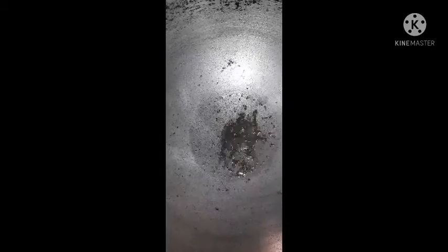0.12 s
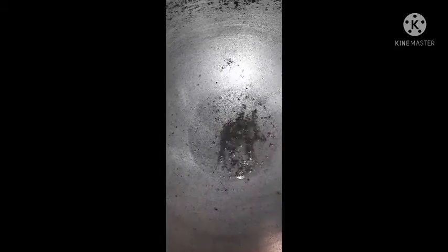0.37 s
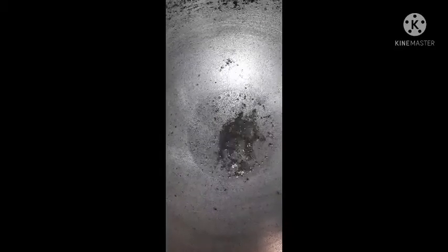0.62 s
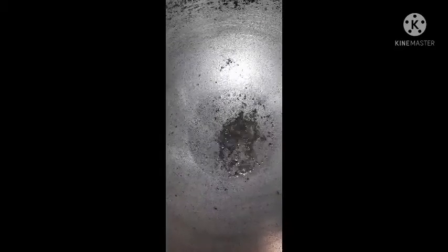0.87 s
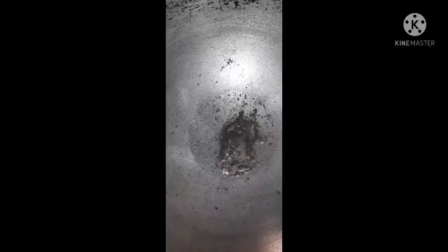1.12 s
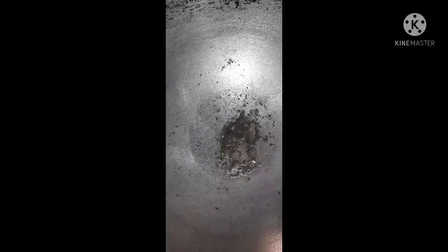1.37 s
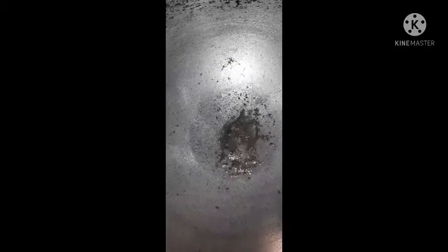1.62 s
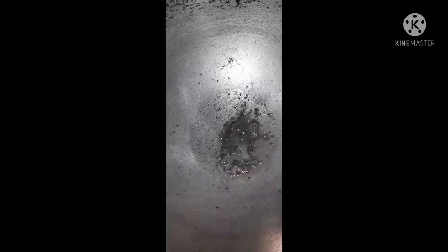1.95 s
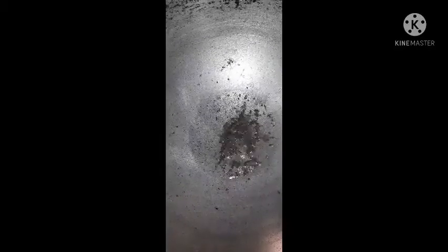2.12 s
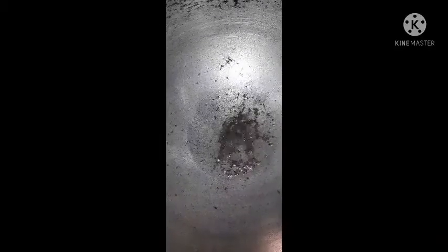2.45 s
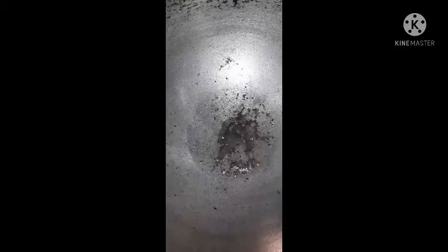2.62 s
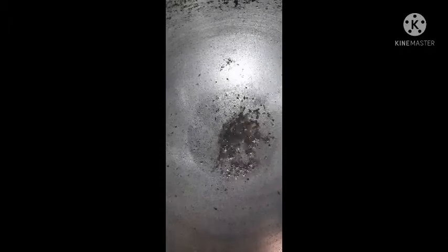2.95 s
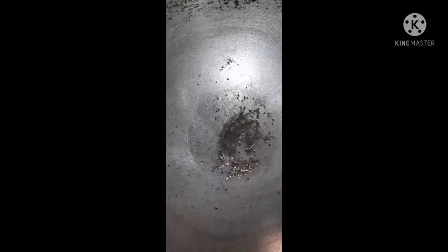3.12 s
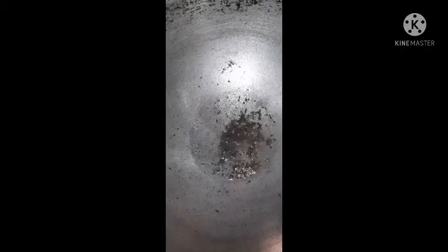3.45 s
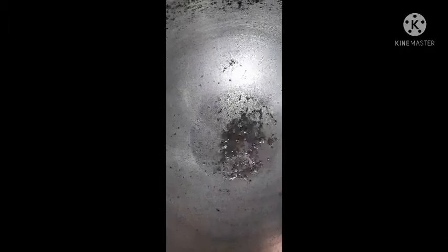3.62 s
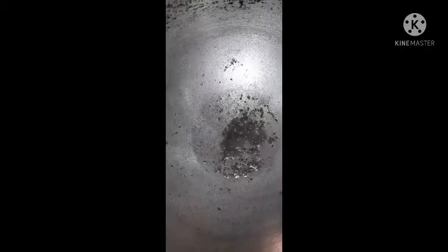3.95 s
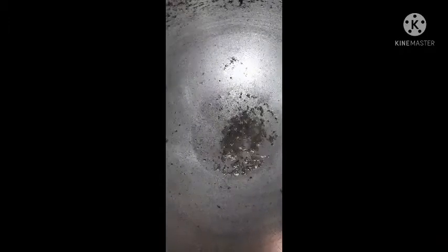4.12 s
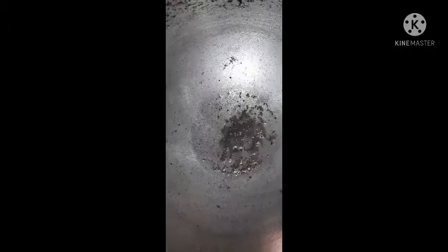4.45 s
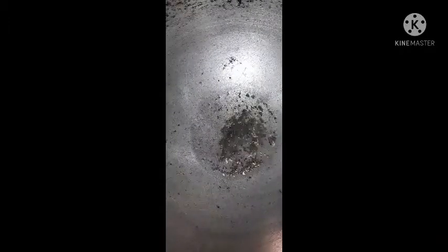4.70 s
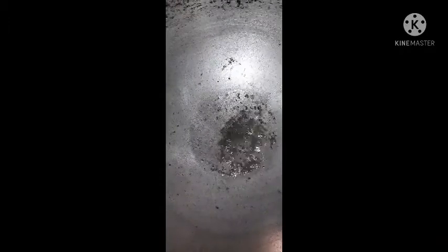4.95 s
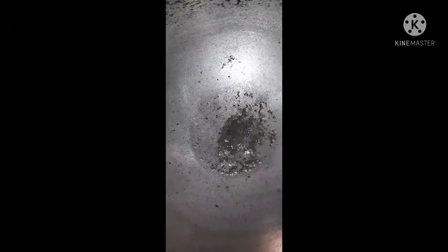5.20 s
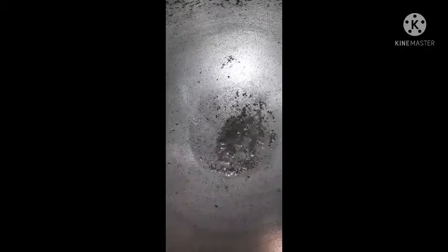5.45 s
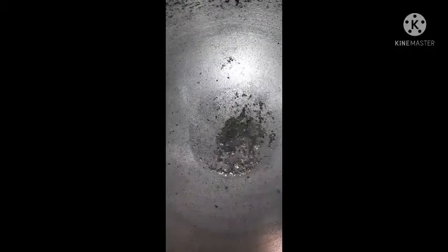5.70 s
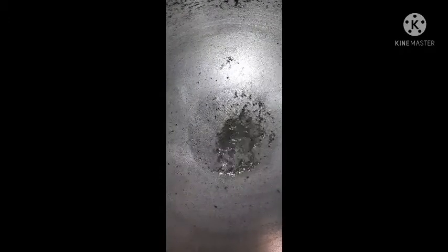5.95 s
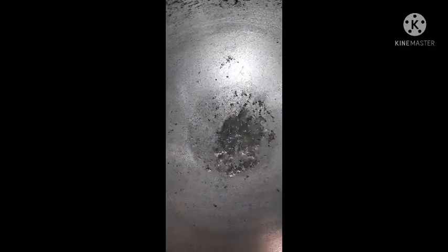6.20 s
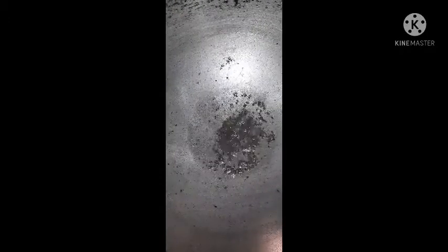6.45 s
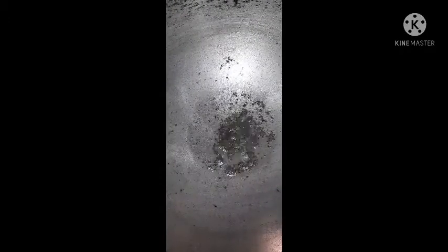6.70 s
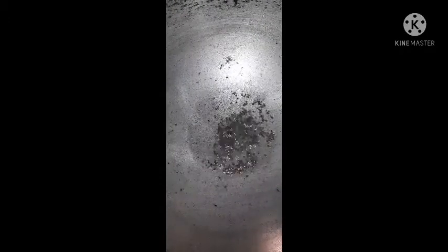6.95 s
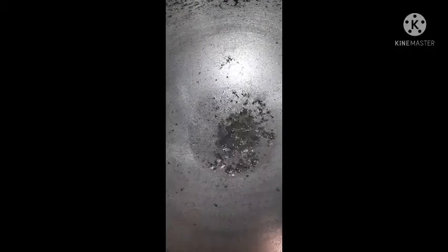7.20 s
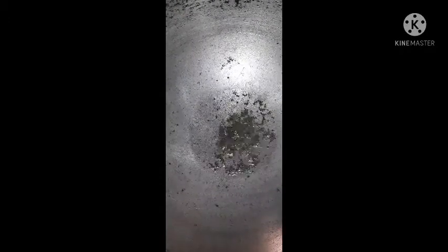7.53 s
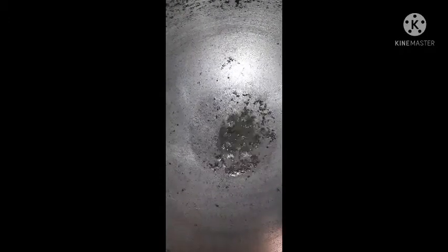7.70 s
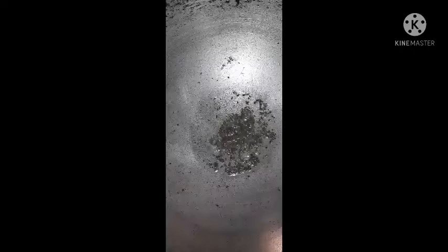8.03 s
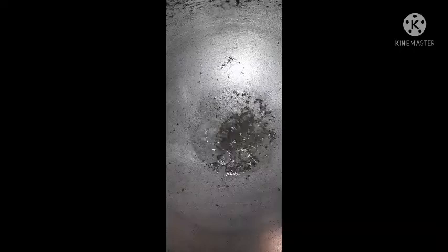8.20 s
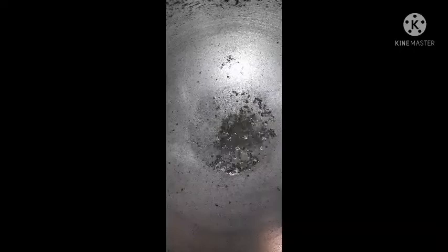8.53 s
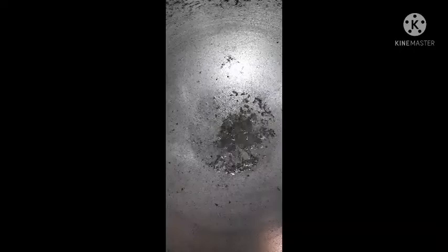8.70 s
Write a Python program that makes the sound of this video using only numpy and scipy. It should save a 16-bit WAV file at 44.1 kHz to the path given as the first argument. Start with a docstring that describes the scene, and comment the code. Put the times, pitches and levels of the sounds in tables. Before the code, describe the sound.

Close stereo pickup over a steel pan of hot oil. Small seeds burst from the first moment in bright, woody pops with sharp snaps, irregular at first, then crowding together. Fine bubbles fizz underneath and water spits click. A few low thumps bump the right side. Dull traffic and far motors hum behind, in a small kitchen with short reverberation.

```python
"""Seeds pop in hot oil in a steel pan under a two-port microphone, over fizzing bubbles and dull street noise.
Pops start at once: each husk rings as a few damped modes, with a noise crack, a second tear and a sharp snap.
Far motors, wavering harmonics, swell early and late. From 1.6 s water spits as clicks; from 2.4 s droplets
thump the right port with a damped push. Near 3.3, 6.1 and 7.9 s narrow noise swells and fades, sinking in
pitch. A slow-running engine joins near 7.7 s, and the fizz flares strongest near 8.3 s."""
import sys
import numpy as np
from scipy import signal
from scipy.fft import rfft, irfft
from scipy.io import wavfile

SR = 44100
rng = np.random.default_rng(int(sys.argv[2]) if len(sys.argv) > 2 else 0)


def output_pcm(signal):
    """Save a mono or channel-first signal as 16-bit PCM at the path in sys.argv[1].

    Samples are clipped to [-1, 1] before scaling.
    """
    pcm = np.clip(np.atleast_2d(signal).T, -1, 1) * 32767
    wavfile.write(sys.argv[1], SR, np.round(pcm).astype(np.int16))


N = 390726
TIME = np.arange(N) / SR  # the whole scene, s
AGE = np.arange(1024) / SR  # time since the start of a short sound, s
EDGE_HZ = 15750  # upper band limit

# loud bursting seeds: (time [s], relative ring energy [dB], ring pitch [Hz], relative snap energy [dB])
POPS = [(0.0375, -8, 4200, -4.5), (0.2706, -30, 4040, -8), (0.4345, -5, 3480, -1),
        (0.6626, -18.5, 2520, -32), (0.7545, -10, 5850, -15), (0.804, -17, 2100, -15),
        (0.8215, -1, 3100, 0), (0.8933, -10, 4430, -19), (0.969, -19.5, 4730, -33),
        (1.0039, -18.5, 2700, -33), (1.0813, -5.5, 4070, -31), (1.093, -6, 2850, -30),
        (1.2416, -17, 4950, -28), (1.2675, -9.5, 3850, -18), (1.297, -9.5, 2400, -12),
        (1.4413, -12.5, 3180, -10), (1.7256, -15, 3200, -33), (1.8333, -5.5, 5000, -15),
        (1.85, -8, 3570, -24), (2.0127, -16.5, 8300, 3), (2.0955, -6.5, 3100, -28),
        (2.1107, -5.5, 3600, 1.5), (2.1697, -9, 8000, -11.5), (2.3854, -6, 4470, -0.5),
        (2.5955, -13.5, 3850, -22), (2.8353, -21.5, 2690, -14), (2.9337, -12, 6070, 4.5),
        (3.0599, -16.5, 4640, -28), (3.153, -17.5, 5370, -4), (3.2998, -2.5, 2054, -41),
        (3.6497, -0.5, 2350, -4), (3.6541, -5.5, 3050, -8), (3.745, -14, 2570, -6.5),
        (3.809, -5, 4460, -11), (3.844, -7.5, 3940, -26), (3.927, -6.5, 5100, -3), (4.1026, -9, 3150, 0),
        (4.165, -3, 2720, -11), (4.1924, -14, 2800, -7), (4.2064, -3.5, 4530, -15), (4.267, -7, 3570, -12),
        (4.4091, -13.5, 2770, -19), (4.5, 1, 2400, 4), (4.56, -11, 3520, -6), (4.6067, -8, 3370, -7),
        (4.7723, -13.5, 3440, -21), (4.929, -18.5, 2400, -28), (5.128, -3, 2270, -7),
        (5.2937, -2.5, 2650, 2.5), (5.353, -12.5, 4600, -17), (5.417, -13, 2870, -17),
        (5.4546, -13, 5230, -29), (5.589, -10, 4720, -16), (5.6301, -8.5, 3780, -5), (5.733, -7, 5100, 1.5),
        (5.9464, -8, 6200, 3.5), (5.979, -11.5, 3060, -33), (6.039, -6, 2330, -12),
        (6.0937, -11.5, 2400, -21), (6.1502, -7.5, 3600, -27), (6.2712, -7, 3970, -16),
        (6.283, -5, 2620, -10), (6.302, -13, 8400, 3), (6.349, -1.5, 2920, -5), (6.4059, -12, 5100, 1.5),
        (6.414, -7.5, 4500, -22), (6.475, -6.5, 3900, 2.5), (6.534, -8.5, 4650, -2),
        (6.6277, -12, 2550, -3), (6.6556, -6.5, 5170, -8), (6.8234, -14, 4800, -23),
        (6.8698, -8, 7950, 0.5), (6.9304, -6.5, 3800, -16), (6.999, -15, 3200, -17),
        (7.0251, -11.5, 2580, -42), (7.131, -2.5, 3900, 0.5), (7.1784, -3.5, 4000, 1),
        (7.2744, -17.5, 2850, -18), (7.2993, -3, 3400, -9), (7.3588, -7.5, 5000, -2),
        (7.406, -3, 4600, 11.5), (7.5285, -9.5, 2940, -6), (7.5546, -6.5, 4370, -25),
        (7.6902, -9.5, 3900, -20), (7.7059, -6, 3430, -28), (7.7413, -4.5, 4150, -28),
        (7.7547, -12.5, 5160, -18), (7.7813, -8.5, 2500, -3.5), (7.8904, -2, 2160, -3),
        (7.92, -6, 4540, -12), (7.992, -11, 3130, 2), (8.0318, -10.5, 2830, -24), (8.065, -8, 3860, -3),
        (8.2053, -15, 5350, -18), (8.2307, -11.5, 7100, 3), (8.2712, 1, 2800, 1), (8.4455, -13, 4060, -24),
        (8.4859, -5, 2940, -5), (8.575, -9.5, 3100, -41), (8.637, -8, 4280, -10), (8.7841, -9.5, 3620, -6)]
# water flashing in the oil, all snap and no ring: (time [s], relative energy [dB])
SPITS = [(1.5942, -2), (1.7942, -3.5), (3.44, -4), (3.4767, 1), (3.521, -2.5), (3.5697, -2.5), (3.972, 3),
         (4.4419, -0.5), (4.5524, -1), (4.579, 0), (4.735, 2), (4.846, 6), (4.9441, -0.5), (4.9812, 1),
         (5.0205, 0.5), (5.388, -4), (6.197, 6.5), (6.923, 4.5), (7.7179, 7), (8.11, 1.5)]
# colour of a snap: (frequency [Hz], relative spectral level [dB])
SNAP_COLOUR = [(100, -15.5), (350, -6.5), (2000, -7.5), (6000, 2.5), (9000, -5.5), (12500, 5), (15500, -7)]
# how hard the oil fizzes, before the spray of each blow: (time [s], level [dB])
FIZZ_CURVE = [(0, -47.5), (.24, -55), (1.3, -49.5), (1.55, -44.5), (2.2, -48), (2.8, -57), (3.85, -49),
              (5.18, -46), (5.87, -53), (6.32, -45), (6.76, -53.5), (8.31, -40.5), (8.6, -51)]


def amp(db):
    """Decibels to gain."""
    return 10 ** (np.asarray(db) / 20)


def unit(x):
    """Scales a sound to a mean energy of 1 a channel."""
    return x / np.sqrt(np.mean(np.sum(x ** 2, -1)) + 1e-20)


def read(points, hz, column=1):
    """Reads a table column on a log-frequency axis."""
    table = np.transpose(points)
    return np.interp(np.log(hz + 1), np.log(table[0] + 1), table[column])


def level(curve):
    """Gain at every sample from rows of (time [s], level [dB])."""
    return amp(np.interp(TIME, *np.transpose(curve)))


def add(mix, s, sound):
    """Mixes a sound in at time s, cut off at the end of the mix."""
    part = mix[..., max(round(s * SR), 0):][..., :sound.shape[-1]]
    part += sound[..., :part.shape[-1]]


def coloured(x, spectrum):
    """Filters a scene-long sound by a spectrum and sets its rms to 1."""
    gain = amp(read(spectrum, np.fft.rfftfreq(N, 1 / SR)))
    return unit(irfft(rfft(x) * gain, N)) * np.sqrt(N)


def click(spectrum, size=1024):
    """A minimum-phase click: its energy comes as early as this spectrum allows."""
    log_gain = np.log(amp(read(spectrum, abs(np.fft.fftfreq(size, 1 / SR)))))
    return unit(np.fft.ifft(np.exp(np.conj(signal.hilbert(log_gain)))).real)


def waver(per_s):
    """Slow random drift along straight lines between normal random knots."""
    knots = np.arange(0, N / SR + 1, 1 / per_s)
    return np.interp(TIME, knots, rng.standard_normal(len(knots)))


def engine(start, length, top_hz, db, overtones_db, rev, swell, wobble):
    """A far motor: a few wavering harmonics whose pitch and level rise and fall in one arch."""
    arch = np.sin(np.pi * np.clip((TIME - start) / length, 0, 1))
    pitch_hz = top_hz * (1 - rev * (1 - arch)) * (1 + wobble * waver(35))
    turns = np.cumsum(pitch_hz) / SR
    tone = sum(amp(d) * np.sin(2 * np.pi * k * turns) for k, d in enumerate(overtones_db, 1))
    return np.sqrt(2) * tone * arch ** swell * amp(db + 3.2 * waver(18))


def street(likeness=0.9):
    """Dull, lumpy traffic noise and far motors, nearly alike at both ports, slightly louder at the right."""
    # rumble before its flutter: (time [s], level [dB])
    rumble_curve = [(0, -55), (1.2, -53), (2.88, -60), (3.55, -56), (7.55, -54.5), (8.3, -51)]
    # colour of the rumble: (frequency [Hz], relative spectral level [dB])
    rumble_colour = [(22, -26), (65, 0.5), (85, -4), (110, 6), (160, -8.5), (280, 0), (420, -6.5),
                     (620, -18.5), (850, -11), (1400, -28), (4000, -29.5)]
    # swelling and fading vehicles, before wavering:
    # (start [s], length [s], top pitch [Hz], relative top level [dB], third harmonic [dB])
    vehicles = [(0.152, 1.09, 204, -62.5, -22), (0.948, 1.4, 287, -50, -19.5),
                (4.616, 0.494, 268, -54, -23), (4.698, 3.1, 270.8, -56.5, -27),
                (7.694, 1.78, 299.8, -54, -15.5)]
    # slow-running engine, before wavering: (start [s], length [s], top pitch [Hz], relative top level [dB])
    idling = (7.69, 1.8, 64.55, -52.5)
    left, other = rng.standard_normal((2, N))
    same = np.clip(likeness, 0, 1)
    right = same * left + np.sqrt(1 - same ** 2) * other
    rumble = level(rumble_curve) * coloured(np.array([left, right]), rumble_colour)
    motors = engine(*idling, [0, -8, -12], rev=0.027, swell=0.22, wobble=0.0141)
    for *row, third_db in vehicles:
        motors += engine(*row, [-1, -25, third_db], rev=.15, swell=1.0, wobble=.013)
    return (amp(waver(12)) * rumble + motors) * amp([[-1], [1]])  # dB at left and right


def kitchen(x, tail_db=-12, build_s=0.01, steel_t60=0.036):
    """A few near echoes, the faint ring of the steel, then a tail whose treble dies first."""
    # reverberation: (frequency [Hz], 60 dB decay time [s])
    decay = [(400, 0.89), (2500, 0.4), (6000, 0.34)]
    # early echoes off the hob and wall: (delay [s], level [dB])
    echoes = [(0.0096, -12.5), (0.015, -19.5)]
    # modes of the steel pan: (frequency [Hz], level [dB])
    steel = [(2331, -26), (2515, -28), (3641, -32), (5609, -33), (6883, -33)]
    t = np.arange(SR // 2) / SR
    hz, age, z = signal.stft(rng.standard_normal((2, len(t))), SR, nperseg=256)
    fading = z * amp(-60 * age / read(decay, hz)[:, None])
    tail = signal.istft(fading, SR, nperseg=256)[1][:, :len(t)]
    room = amp(tail_db) * unit(tail * (1 - np.exp(-(t / build_s) ** 2)))
    for delay, db in echoes:
        add(room, delay, amp(db) * bowl(np.ones(1), near_db=3, far_db=4))
    for mode_hz, db in steel:
        wave = np.sin(2 * np.pi * (mode_hz * t + rng.random((2, 1))))
        room += amp(db) * unit(amp(-60 * t / steel_t60) * wave)
    return signal.fftconvolve(x, room, axes=1)[:, :N]


def bowl(sound, near_db, far_db, near_t60=.0055, far_t60=.045, rim_hz=2000):
    """Sound comes straight up and also glances round the pan, by new random paths every time."""
    paths = rng.standard_normal((2, len(AGE))) * (1 - np.exp(-(AGE / 0.00021) ** 2))
    near = amp(near_db) * unit(paths * amp(-60 * AGE / near_t60))
    far = amp(far_db) * unit(paths[::-1] * amp(-60 * AGE / far_t60))  # channels swapped
    # long waves bend round the rim
    paths = signal.lfilter(*signal.butter(1, rim_hz, "high", fs=SR), near + far)
    paths[[0, 1], rng.integers(0, 4, 2)] += 1  # direct sound, 0 to 3 samples late at each port
    heard = signal.fftconvolve(paths, sound[None], axes=1)
    # each channel keeps the energy of the source
    return heard * np.linalg.norm(sound) / np.linalg.norm(heard, axis=1, keepdims=True)


def ports(x):
    """The two ports differ in tone, and the right one lags in phase in the upper range."""
    # phase lag of the right port: (frequency [Hz], lag [rad])
    lag = [(2200, 0), (3000, 1.8), (5200, 3.8), (8000, 6.3)]
    # left minus right: (frequency [Hz], level difference [dB])
    balance = [(2500, -2.3), (5000, 0), (8000, 0), (11000, 5)]
    hz = np.fft.rfftfreq(N, 1 / SR)
    half = amp(read(balance, hz) / 2)
    return irfft(rfft(x) * np.array([half, np.exp(-1j * read(lag, hz)) / half]), N)


def fizz(bubbles_per_s=600, spread_db=3.0, bubbles_db=-7.0, hiss_db=-6, clump_db=4, sharpness=3):
    """Tiny steam bubbles tick in clumps as short resonances over a hiss; both flare after a spit or snap."""
    # colour of bubbles and hiss: (frequency [Hz], relative spectral level [dB])
    fizz_colour = [(600, 7), (1500, 1), (2600, 6), (5000, 1), (8000, 6.5), (14000, 6)]
    bubble_hz = np.geomspace(2500, 14000, 7)
    spray_db, spray_s = -43, 0.033  # oil thrown up: level against the blow, fade time

    chance = rng.random(N)
    sign = rng.choice([-1., 1.], (2, N))
    pitch = rng.integers(0, len(bubble_hz), N)
    sizes = amp(spread_db * np.minimum(rng.exponential(1, N), 5) + clump_db * waver(42))
    ticks = sign * sizes * (chance < bubbles_per_s / SR)
    bubbles = np.zeros((2, N))
    for k, hz in enumerate(bubble_hz):
        resonance = signal.iirpeak(hz, max(sharpness, 1), fs=SR)
        bubbles += signal.lfilter(*resonance, ticks * (pitch == k))
    bubbles = signal.fftconvolve(bubbles, bowl(np.ones(1), near_db=-3, far_db=-14), axes=1)[:, :N]
    hiss = coloured(rng.standard_normal((2, N)), fizz_colour)

    spray = np.zeros(N)
    for s, *_, db in SPITS + POPS:
        add(spray, s, amp(db + spray_db) * np.exp(-TIME / spray_s))
    texture = amp(bubbles_db) * coloured(bubbles, fizz_colour) + amp(hiss_db) * hiss
    return np.hypot(level(FIZZ_CURVE), spray) * texture


def noise_swells(width_hz=260, sag_hz_per_s=1300):
    """Narrow bands of noise that swell and fade around a moment while their centre sinks steadily."""
    # (loudest at [s], swell and fade time [s], centre pitch at that moment [Hz], level [dB])
    swells = [(3.31, 0.052, 2210, -49), (6.08, 0.084, 2330, -47.5), (7.87, 0.085, 2255, -52)]
    out = np.zeros(N)
    for s, fade_s, hz, db in swells:
        noise = [1, 1j] @ rng.standard_normal((2, N))
        flutter = signal.lfilter(*signal.butter(2, width_hz / 2, fs=SR), noise)
        turns = np.cumsum(hz - sag_hz_per_s * (TIME - s)) / SR
        band = (flutter * np.exp(2j * np.pi * turns)).real
        out += amp(db) * np.exp(-abs(TIME - s) / fade_s) * unit(band) * np.sqrt(N)
    return out


def droplets(push_s=0.00041, low_hz=34, push_gain_db=1, splash_db=-1):
    """A droplet shoves the air in the right port; damped low modes swing back, and the splash ticks."""
    # (time [s], relative strength [dB], signed polarity and size of the shove [ratio]: + pushes, - pulls)
    strikes = [(2.4301, -4, -0.89), (3.6642, -0.5, 0.61), (5.1842, -2.5, 0.64), (6.0115, -9.5, -2.56),
               (7.11, -2, 1), (8.3059, -11.5, 0.33), (8.3361, -2, -0.5), (8.804, -3.5, 0.47)]
    # how the struck port swings: (frequency [Hz], width [Hz], signed gain [ratio])
    port_modes = [(49, 40, -3), (115.7, 19, 1.33)]
    out, t = np.zeros((2, N)), np.arange(SR // 5) / SR
    pulse = t / push_s * np.exp(1 - t / push_s)
    push = signal.lfilter(*signal.butter(2, low_hz, "high", fs=SR), pulse)
    thump = push.copy()
    for hz, width, gain in port_modes:
        thump += gain * signal.lfilter(*signal.iirpeak(hz, hz / width, fs=SR), push)
    for s, db, shove in strikes:
        add(out[1], s, shove * amp(db + push_gain_db) * thump)
        add(out, s, amp(db + splash_db) * bowl(click(SNAP_COLOUR), near_db=0.0, far_db=-7.0))
    return out


def weak_pops(count=280, faintest_db=-29.5, range_db=17, low_hz=2400, high_hz=6200):
    """Many small seeds burst at random, most of them where the oil fizzes hardest."""
    # the rate follows this power of the fizz, and grows as the oil heats
    bunching, heating_db_per_s = 1.2, .5
    out = np.zeros((2, N))
    due = np.cumsum(level(FIZZ_CURVE) ** bunching * amp(heating_db_per_s * TIME))
    for turn, (when, size, pitch) in enumerate(rng.random((count, 3))):
        s = np.interp((turn + when) / count, due / due[-1], TIME)
        ring = husk(low_hz * (high_hz / low_hz) ** pitch)
        # the cube makes most of them faint
        add(out, s, amp(faintest_db + range_db * size ** 3) * bowl(ring, near_db=0, far_db=-1))
    return out


def husk(hz, scatter=0.047, crack_db=-3, crack_s=0.002, low_hz=1800, top_hz=9000):
    """A husk tears with a rough noise crack and rings briefly in damped modes, scattered in every seed."""
    # modes before scatter: (multiple of the ring pitch [ratio], relative level [dB])
    husk_modes = [(1.002, 4), (1.28, -0.5), (1.65, -13.5), (2.15, -21.5)]
    # plump low seeds to slim high ones: (ring pitch [Hz], sharpness Q [ratio], level offset of the crack
    # against the modes [dB])
    build = [(2500, 11, -2), (3200, 10.3, -1)]
    shift, size = rng.standard_normal((2, len(husk_modes)))
    shift[0] = size[0] = 0
    ratio, db = np.transpose(husk_modes)
    sharpness, rest_db = read(build, hz), read(build, hz, column=2)
    mode_hz = np.minimum(hz * ratio * np.exp(scatter * shift), EDGE_HZ)[:, None]
    fade = np.exp(-np.pi * mode_hz / sharpness * AGE)
    modes = np.sqrt(mode_hz) * fade * np.sin(2 * np.pi * mode_hz * AGE)
    gains = rng.choice([-1, 1], len(db)) * amp(db + 2 * size + rest_db * (ratio > 1))
    ring = gains @ modes
    crack = rng.standard_normal(len(AGE)) * np.exp(-AGE / crack_s)
    crack = signal.lfilter(*signal.butter(1, [hz, min(2 * hz, EDGE_HZ)], "band", fs=SR), crack)
    ring = unit(ring) + amp(crack_db + rest_db) * unit(crack)
    # too small to radiate much bass
    ring = signal.lfilter(*signal.butter(2, low_hz, "high", fs=SR), ring)
    # the oil dulls the top
    return unit(signal.lfilter(*signal.butter(1, min(top_hz, EDGE_HZ), fs=SR), ring))


def burst(hz, spread_db=4, higher=1.1, retear_s=0.0055, retear_db=-9.5):
    """The husk splits, then tears once more within retear_s, weaker and at a somewhat higher pitch."""
    wait, size, pitch = rng.random(3)
    out = bowl(husk(hz), near_db=-6, far_db=-7)
    again = bowl(husk(hz * higher ** pitch), near_db=-2, far_db=-7)
    again_db = retear_db + spread_db * (2 * size - 1)
    add(out, retear_s * (1 + 3 * wait) / 4, amp(again_db) * again)
    return unit(out)


def seeds(ring_gain_db=6.5, snap_gain_db=-6.5, spit_gain_db=-2.5):
    """Loud pops as husk rings and sharp snaps, and water spits as clicks, all rattling round the bowl."""
    # colour of a spit: (frequency [Hz], relative spectral level [dB])
    spit_colour = [(250, -7), (2500, -8.5), (6000, -6.5), (12500, 0)]
    rings, snaps, snap = np.zeros((2, N)), np.zeros((2, N)), click(SNAP_COLOUR)
    for s, ring_db, hz, snap_db in POPS:
        add(rings, s, amp(ring_db + ring_gain_db) * burst(hz))
        add(snaps, s, amp(snap_db + snap_gain_db) * bowl(snap, near_db=-0.5, far_db=-25))
    for s, db in SPITS:
        spit = bowl(click(spit_colour), near_db=1, far_db=-12, near_t60=.003)
        add(snaps, s, amp(db + spit_gain_db) * spit)
    return rings, snaps


def scene(snap_room_db=-5):
    """The pan in its room, the droplets, the street; shrill snaps beam upward and stir the room less."""
    rings, snaps = seeds()
    pan = rings + weak_pops() + fizz() + noise_swells()
    room = kitchen(pan + amp(snap_room_db) * snaps)
    return ports(pan + snaps + room) + droplets() + street()


def record(dry, ceiling=0.99):
    """The sharpest peaks round off in the recorder; then its band limit."""
    rounded = dry / (1 + (dry / ceiling) ** 8) ** (1 / 8)
    band = signal.firwin(255, EDGE_HZ, window=("kaiser", 9), fs=SR)
    return signal.oaconvolve(rounded, band[None], "same")


dry = scene()
out = record(dry)
output_pcm(out)
```